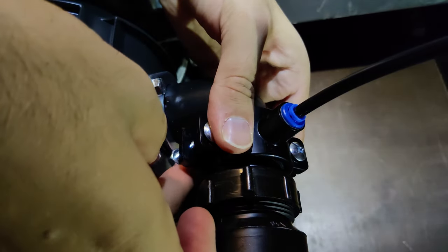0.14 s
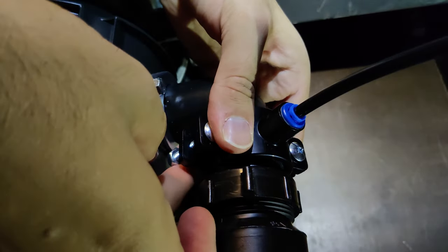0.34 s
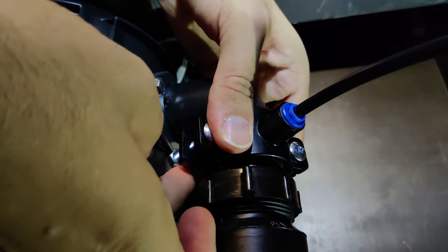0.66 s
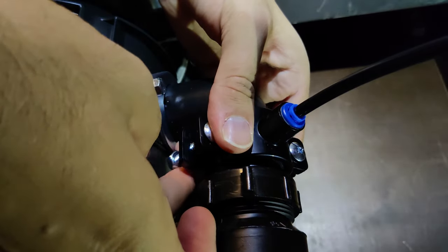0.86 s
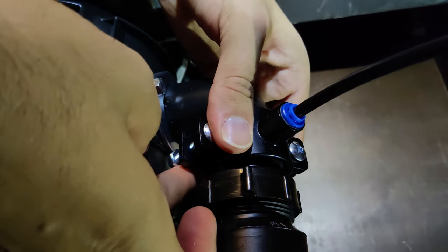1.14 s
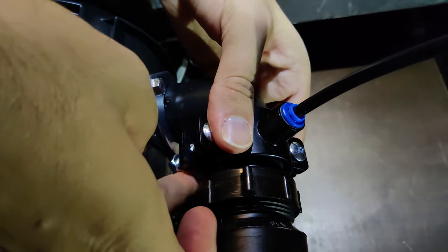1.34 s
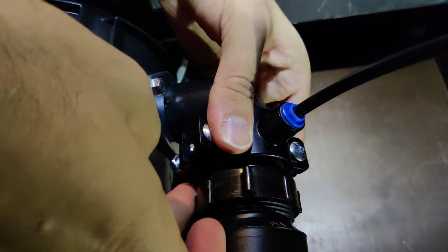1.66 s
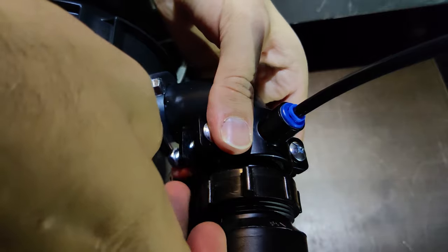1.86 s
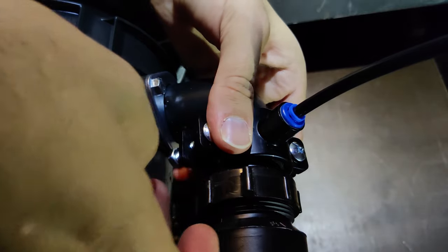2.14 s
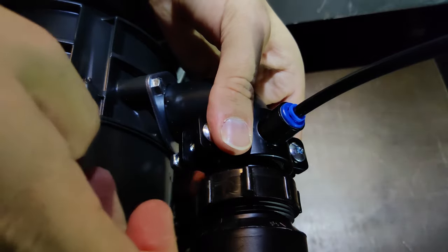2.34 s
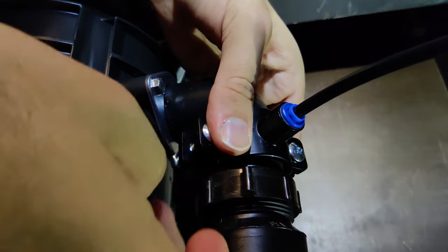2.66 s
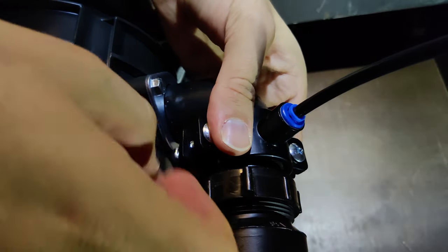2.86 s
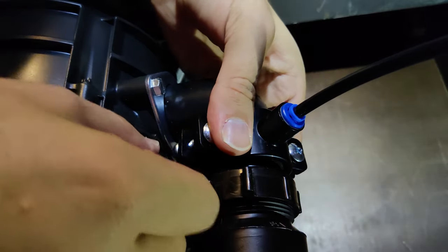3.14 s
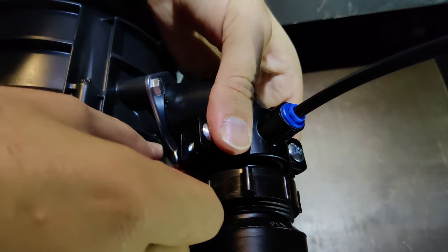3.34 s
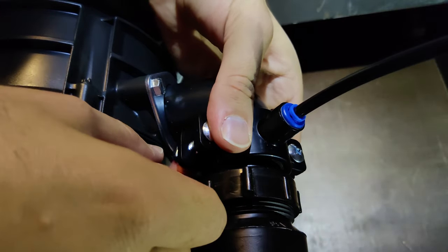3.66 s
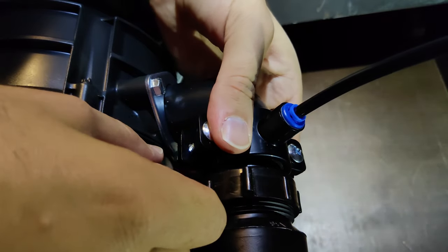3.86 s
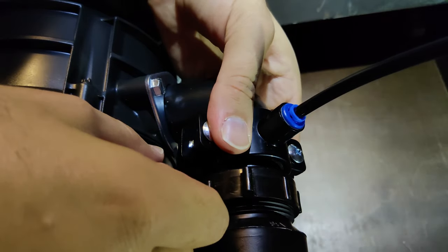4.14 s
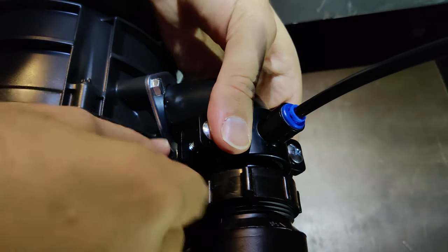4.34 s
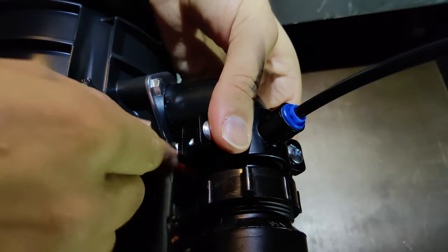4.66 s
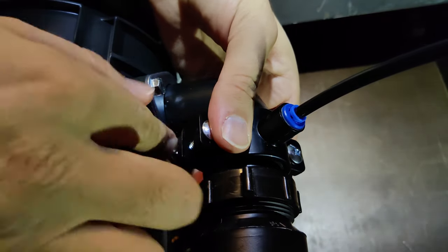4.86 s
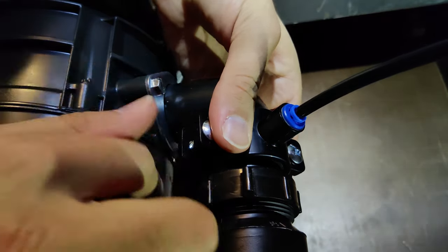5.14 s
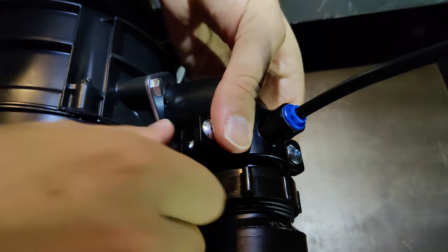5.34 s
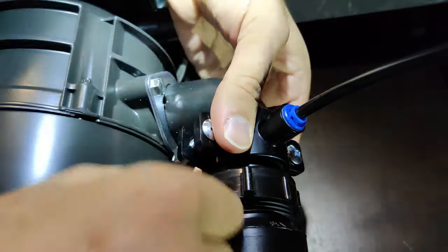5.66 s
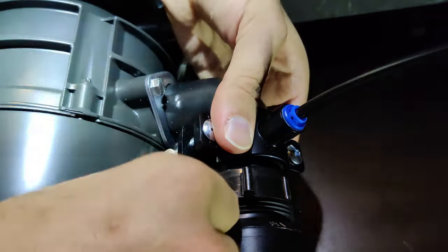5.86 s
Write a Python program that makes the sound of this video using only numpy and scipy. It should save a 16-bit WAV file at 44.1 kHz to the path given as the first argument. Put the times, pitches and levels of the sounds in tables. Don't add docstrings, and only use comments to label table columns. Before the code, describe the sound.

A close handheld microphone inside a small sink cabinet picks up nuts being threaded by hand onto a drain pipe clamp. From 0 to 1.4 s it is mostly deep, wobbling handling rumble, faint room hum and hiss flaring in short puffs, with a few weak ticks and a microphone jolt near 1.0 s. From about 1.6 s irregular clicks, dull hollow knocks and tiny gritty slips begin, clustering around 2.0-2.4 and 2.5-3.0 s, with soft low thuds beneath. The firmest knocks land near 3.2, 3.8 and 4.1 s, amid bright metal ticks. It thins out around 4.3-4.7 s under heavy shaking, then another jolt comes at 5.0 s. A sharp knock and clicks follow at 5.15-5.2 s with a faint bright skin rub until 5.55 s. Strong rattly clicks close at 5.65 and 5.8 s, before a final surge of low rumble. Reflections are short and boxy.

```python
import sys
import numpy as np
from scipy import signal
from scipy.fft import rfft, irfft, next_fast_len
from scipy.io import wavfile
from scipy.ndimage import uniform_filter1d

SR = 44100
rng = np.random.default_rng(int(sys.argv[2]) if len(sys.argv) > 2 else 0)


def bounce(signal):
    frames = np.transpose(np.atleast_2d(signal))
    limited = np.clip(frames, -1, 1)
    pcm = np.round(limited * 32767).astype(np.int16)
    wavfile.write(sys.argv[1], SR, pcm)


def invert_db(x):
    u = np.asarray(x, float) / 20
    return 10 ** u


N = 264159


def add(mix, start_s, sound):
    part = mix[round(start_s * SR):][:len(sound)]
    part += sound[:len(part)]


def knocks():
    # start_s, peak_db, pipe_db and bolt_db (re clamp), favoured_hz (mode set by the spot)
    firm = [(1.612, -21.5, -4, -15, 1480), (2.543, -21, -1, -5.5, 1720), (2.558, -19, -5, -28, 1790),
            (2.876, -20, -8, -4, 1500), (2.915, -28.5, 2, -16, 1870), (3.224, -15.5, 1, -13.5, 1700),
            (3.523, -25, 4, -12, 1720), (3.792, -11, -12.5, -3.5, 1990), (3.849, -26.5, 5, -7, 1950),
            (3.999, -28, -1.5, -11.5, 1980), (4.119, -12, -10, -5, 2100), (4.157, -23, 4, -10.5, 1670),
            (4.717, -22, -3.5, -11.5, 2000), (5.153, -12.5, -14, -15.5, 1800)]
    # start_s, peak_db, pipe_db and bolt_db (re clamp)
    light = [(0.721, -36.5, -3, -21), (0.911, -36, -17, -4), (1.382, -33, 0, -9.5), (1.984, -28.5, -2, -18),
             (2.29, -27.5, 3, -16), (2.761, -32.5, 1.5, -27), (3.19, -26, 0, -2.5), (3.272, -30.5, -12, -1),
             (3.466, -28, -6.5, -10), (3.679, -33, 5, -8), (4.753, -33, -4, -18), (5.072, -31, -4.5, -10),
             (5.486, -35, -4, -8), (5.533, -27, 2.5, -12), (5.587, -32.5, -6, -1.5)]
    out = np.zeros(N)
    for start_s, peak_db, pipe_db, bolt_db, spot_hz in firm + [(*row, 1670) for row in light]:
        nut_db = -13.5 + 0.85 * bolt_db
        add(out, start_s, sudden(peak_db, pipe_db, bolt_db, nut_db, spot_hz))
    return out


def clicks():
    # start_s, peak_db, pipe_db and nut_db (re clamp), favoured_hz
    firm = [(1.923, -22.5, -3, -4, 1120), (2.057, -20.5, -5, -1.5, 1240), (2.235, -17.5, -4, -7, 1270),
            (2.348, -17.5, 0, -2.5, 2000), (2.666, -19.5, -4, 4, 1320), (3.298, -23.5, -6, -5.5, 1870),
            (3.591, -19, -5.5, -1, 2220), (3.899, -22, -1, -4, 950), (4.235, -24, -3.5, -5.5, 3220),
            (4.858, -21, -1.5, -36, 980), (5.186, -18.5, -1, -5.5, 1160), (5.654, -14, 5, 2.5, 1230),
            (5.813, -18.5, 0, 2.5, 2050)]
    # start_s, peak_db, pipe_db and nut_db (re clamp)
    light = [(0.211, -33, -13, 1), (1.739, -21, -32, 4.5), (2.417, -33.5, 3.5, -9), (2.991, -28.5, -21, 11),
             (3.076, -33.5, 3, 2.5), (3.335, -32, -20, 9.5), (3.379, -32.5, 2, 1), (3.636, -33, -7, 1),
             (4.306, -36, 2, -1), (4.782, -35, -12, -0.5), (4.883, -40, -12, 11), (5.09, -34.5, -13, 8.5),
             (5.221, -33, -14, -1), (5.562, -34.5, -3, -10), (5.635, -28, 3, 3)]
    out = np.zeros(N)
    for start_s, peak_db, pipe_db, nut_db, spot_hz in firm + [(*row, 1420) for row in light]:
        bolt_db = -5 + 0.13 * nut_db
        add(out, start_s, sudden(peak_db, pipe_db, bolt_db, nut_db, spot_hz))
    return out


def slips():
    # start_s, peak_db, nut_db (re clamp), swell_s
    slip_events = [(1.707, -31.5, -10, 0.015), (1.721, -31.5, 3.5, 0.014), (2.022, -30.5, -4.5, 0.0085),
                   (2.074, -35, 0, 0.0056), (2.338, -24.5, 1.5, 0.0063), (2.645, -26.5, -2, 0.0077),
                   (2.689, -38.5, -8, 0.016), (2.972, -29.5, -9, 0.011), (3.261, -29, -3, 0.02),
                   (3.316, -35.5, 5, 0.0099), (3.348, -43, -11, 0.017), (3.573, -24, -3, 0.0082),
                   (3.611, -36.5, 8, 0.0082), (3.888, -25.5, -5, 0.0097), (4.139, -30.5, -30, 0.0078),
                   (4.172, -38, -22, 0.0056), (4.205, -28, -5, 0.0073), (4.254, -39.5, 1, 0.0075),
                   (4.825, -32.5, -2, 0.015), (5.164, -32.5, -27, 0.004), (5.2, -33.5, -28, 0.011),
                   (5.14, -29.5, -7, 0.012), (5.514, -38.5, -21, 0.0074), (5.669, -26.5, -1.5, 0.0059)]
    out = np.zeros(N)
    for start_s, peak_db, nut_db, swell_s in slip_events:
        bolt_db = -3.5 + 0.17 * nut_db
        add(out, start_s, gradual(peak_db, 0, bolt_db, nut_db, swell_s))
    return out


def touches():
    # start_s, peak_db, bolt_db and nut_db (re clamp)
    touch_events = [(1.696, -36, -21, -14), (2.148, -42, 1.5, 3.5), (2.304, -44, 4, -4),
                    (2.327, -29.5, 1, -11), (2.434, -40, -7, -3), (2.527, -36.5, -1, 0),
                    (2.634, -30, -1.5, -19), (2.859, -31, -21, 1.5), (3.007, -44, -11, -16),
                    (3.183, -44.5, 0, 9), (3.564, -29.5, -2, -17), (3.865, -34, -4, -17),
                    (4.012, -39, -4, 0), (4.384, -37, -37, -10), (4.485, -39, -6, -10),
                    (4.699, -43, -12, -2), (4.912, -39, -7, -4), (5.109, -39, -10, -22),
                    (5.76, -36.5, -4, -11)]
    out = np.zeros(N)
    for start_s, peak_db, bolt_db, nut_db in touch_events:
        add(out, start_s, gradual(peak_db, -10.5, bolt_db, nut_db, 0.0042))
    return out


def sudden(peak_db, pipe_db, bolt_db, nut_db, spot_hz):
    rattle_s = 0.0069 * np.exp(0.0361 * pipe_db - 0.06 * (peak_db + 20))
    u = np.arange(3000) / SR / rattle_s
    shape = np.exp(-u ** 1.5) * (1 - np.exp(-10 * u))
    return contact(peak_db, pipe_db, bolt_db, nut_db, shape, 2.9, spot_hz, 11.5)


def gradual(peak_db, pipe_db, bolt_db, nut_db, swell_s):
    u = np.arange(3000) / SR / swell_s
    shape = u ** 1.32 * np.exp(-u)
    return contact(peak_db, pipe_db, bolt_db, nut_db, shape, 3.25, 1500, 9.5)


def contact(peak_db, pipe_db, bolt_db, nut_db, shape, grit_db, spot_hz, favour_db):
    # pitch_hz, level_db, t60_s
    pipe = [(450, -2.5, 0.079), (499, 0.5, 0.075), (699, -1.5, 0.12), (248.5, -6.5, 0.097),
            (151.2, -2, 0.72), (360, -7, 0.092)]
    clamp = [(844.5, -9, 0.19), (941, -5, 0.064), (1200, 0.5, 0.028), (1530, -1.5, 0.023),
             (1751, -6.5, 0.05), (1977, 0, 0.02), (2340, 1.5, 0.027), (2750, -2, 0.0055), (2927, -1, 0.016),
             (3240, 0, 0.0087)]
    bolt = [(3820, -2.5, 0.0068), (4675, -7.5, 0.0053), (5170, 1.5, 0.014), (6000, -32, 0.0054),
            (6530, -1.5, 0.015), (7020, -6, 0.031), (7650, -19, 0.075), (8500, -4, 0.017)]
    nut = [(9300, 7.5, 0.027), (9566, 15.5, 0.028), (9350, 8, 0.033), (10400, -5, 0.0088),
           (11430, -2, 0.0072), (12300, -8, 0.0085)]
    grit = invert_db(grit_db * np.minimum(rng.exponential(1, 3000), 3.5)) * rng.standard_normal(3000)
    force = shape * grit
    chance = rng.standard_normal((4, 10, 2))
    hardness_db = 0.51 * bolt_db - 4.0
    favour_db = favour_db * np.clip(-bolt_db / 13, 0, 1)
    favoured = []
    for hz, mode_db, t60_s in clamp:
        nearness = np.exp(-(np.log(hz / spot_hz) / 0.19) ** 2)
        favoured.append((hz, mode_db + favour_db * nearness, t60_s))
    sound = ring(favoured, force, chance[0], 4.0, 0.13, hardness_db)
    swell = 1 - np.exp(-np.arange(len(sound)) / SR / 0.0067)
    sound += invert_db(pipe_db) * ring(pipe, force, chance[1], -7, 0.072) * swell
    sound += invert_db(bolt_db) * ring(bolt, force, chance[2], 6.0, 0.14)
    sound += invert_db(nut_db) * ring(nut, force, chance[3], -12.5, 0.086)
    crackle = np.convolve(force, [1, 1, -1, -1]) / np.sqrt(uniform_filter1d(force ** 2, 200).max())
    crackle_db = max(bolt_db, nut_db) - 19 + 0.28 * (peak_db + 25.5)
    sound[:3003] += invert_db(crackle_db) * crackle
    return invert_db(peak_db - 6) * sound


def ring(modes, force, chance, minor_db, minor_width, tilt_db=0.0):
    t = np.arange(2600) / SR
    hz, db, t60_s = np.transpose(modes)[:, :, None]
    db = db + tilt_db * np.log2(hz / hz[0])
    strength_db = 1.8 * chance[:len(modes), :1]
    pitch = 1 + 0.006 * chance[:len(modes), 1:]
    main = invert_db(db + strength_db - 60 * t / t60_s) * np.sin(2 * np.pi * hz * pitch * t)
    neighbour_hz = hz * np.exp(minor_width * rng.uniform(-1.07, 1, (8, len(modes), 1)))
    signs = rng.choice([-1, 1], neighbour_hz.shape)
    early = t[:450]
    minor = signs * invert_db(db + minor_db - 220 * early / t60_s) * np.sin(2 * np.pi * neighbour_hz * early)
    response = main.sum(0)
    response[:len(early)] += minor.sum((0, 1))
    sound = signal.fftconvolve(force, response)
    sound = balanced(sound, hz, db + strength_db, minor_width)
    return sound / np.sqrt(2 * uniform_filter1d(sound ** 2, 200).max())


def balanced(sound, hz, db, spread):
    size = 8192
    f = np.fft.rfftfreq(size, 1 / SR)
    spectrum = rfft(sound, size)
    wanted = (invert_db(2 * db) * np.exp(-(np.log((f + 1) / hz) / spread) ** 2)).sum(0)
    bins = int(spread * hz.mean() * size / SR) + 1

    def smooth(power):
        return abs(uniform_filter1d(uniform_filter1d(power, bins), bins))

    correction = np.sqrt(smooth(wanted) / (smooth(abs(spectrum) ** 2) + 1e-12))
    return irfft(spectrum * correction)[:len(sound)]


def cabinet(x):
    t = np.arange(6000) / SR
    t60_s, level_db, gap_s = 0.077, -7, 0.0015
    tail = rng.standard_normal(6000) * invert_db(-60 * t / t60_s) * (t > gap_s)
    return x + invert_db(level_db) * signal.fftconvolve(x, tail / np.linalg.norm(tail))[:N]


def thuds():
    # start_s, peak_db, pitch_hz, t60_s
    thud_events = [(1.414, -41, 99, 0.23), (2.06, -30.5, 73, 0.16), (2.338, -28.5, 100.5, 0.18),
                   (2.667, -32, 72.7, 0.15), (2.994, -24, 74, 0.048), (3.229, -29.5, 83, 0.15),
                   (3.299, -36, 72, 0.12), (3.589, -30, 84, 0.13), (3.789, -55, 72, 0.11),
                   (4.241, -29, 72.7, 0.15), (4.859, -41, 74, 0.1), (5.18, -26.5, 102.8, 0.24),
                   (5.237, -30, 71, 0.18), (5.551, -29, 72.7, 0.14), (5.66, -38, 88, 0.14),
                   (5.818, -27.5, 74.6, 0.19)]
    out, t = np.zeros(N), np.arange(12000) / SR
    for start_s, peak_db, hz, t60_s in thud_events:
        envelope = invert_db(peak_db + 7 - 60 * t / t60_s) * (1 - np.exp(-t * hz))
        add(out, start_s, envelope * np.sin(2 * np.pi * hz * t))
    return out


def bumps():
    # start_s, step (full scale), relax_s
    step_events = [
        (1.021, 0.057, 0.061),
        (5.002, -.05, 0.012),
    ]
    out, t = np.zeros(N), np.arange(8000) / SR
    for start_s, step, relax_s in step_events:
        add(out, start_s, step * np.exp(-t / relax_s) * (1 - np.exp(-t / 0.00006)))
    return out


def noise(spectrum):
    size = next_fast_len(N, True)
    hz = np.fft.rfftfreq(size, 1 / SR)
    f, db = np.transpose(spectrum)
    colour = invert_db(np.interp(np.log(hz + 0.033), np.log(f), db, left=-60))
    colour *= invert_db(-12 * np.log2(np.maximum(hz / f[-1], 1)))
    x = irfft(rfft(rng.standard_normal(size)) * colour, size)[:N]
    return x / np.sqrt(np.mean(x ** 2) + 1e-20)


def shaking(grip_db, busy):
    # pitch_hz, level_db (per Hz)
    sway_spectrum = [(2, -4.5), (7, -7), (12, -5), (17, -3.5), (26, -11.5), (35, -25), (48, -34), (70, -68)]
    tremor_spectrum = [(14, -8), (19, 1), (27, -6), (36, -16)]
    t = np.arange(N) / SR
    tremor = invert_db(-16 + 12 * uniform_filter1d(busy, SR)) * noise(tremor_spectrum)
    shake = invert_db(grip_db) * (noise(sway_spectrum) + tremor)
    fade = np.clip(np.minimum(t, t[-1] - t + 0.01) / 0.04, 0, 1)
    return 0.45 * np.tanh(shake / 0.45) * fade


def rumble(busy):
    # pitch_hz, level_db (per Hz)
    handling_spectrum = [(30, 8), (48, -4), (75, -8.5), (105, 0.5), (135, -15), (200, -7), (310, -21.5),
                         (450, -14)]
    room_spectrum = [(250, 0), (380, -5.5), (480, 0.5), (620, -6.5), (850, 3), (1300, -4), (2500, -10),
                     (5000, -16)]
    handling = invert_db(-47.5 + 9 * busy) * noise(handling_spectrum)
    return handling + invert_db(-49 - 0.5 * busy) * noise(room_spectrum)


def skin():
    # time_s, level_db
    slide = [
        (5.15, -51),
        (5.272, -50.5),
        (5.55, -50.5),
    ]
    level_db = np.interp(np.arange(N) / SR, *np.transpose(slide), left=-120, right=-120)
    return invert_db(level_db - 1.5) * noise([(3500, -29), (5200, -3), (6500, -4), (8500, 0), (10500, -3)])


def hiss():
    # pitch_hz, level_db (per Hz)
    hiss_spectrum = [(800, -3.5), (2500, -3), (6000, -1), (10000, -2), (15000, -3.5)]
    # centre_s, rise_db
    flares = [(.125, 2.5), (.345, 2), (.587, 5), (.737, 1), (.812, 6.5), (.885, 6), (.998, 7), (1.065, 5),
              (1.268, 2.5), (1.347, 5), (1.470, 2.5), (1.513, 2.5), (2.475, -1), (4.52, 4), (4.925, 5)]
    t = np.arange(N) / SR
    flare_db, u = np.zeros(N), t[:2000] - t[1000]
    for centre_s, rise_db in flares:
        add(flare_db, centre_s - t[1000], rise_db * np.exp(-(u / 0.0091) ** 2))
    return invert_db(-59 + 7.5 + flare_db) * noise(hiss_spectrum)


def background(work):
    # time_s, shaking_db
    grip = [(0.0, -15.5), (0.08, -18.5), (0.78, -18), (0.8, -10), (2.13, -23.5), (2.2, -18), (3.19, -19),
            (3.35, -16.5), (3.5, -22.5), (3.77, -15), (3.84, -21), (4.64, -13), (4.72, -24), (4.97, -9),
            (5.2, -26), (5.36, -13.5), (5.94, -15.5), (5.99, 11)]
    grip_db = np.interp(np.arange(N) / SR, *np.transpose(grip))
    work_rms = np.sqrt(abs(uniform_filter1d(work ** 2, int(0.26 * SR) + 1)))
    busy = np.tanh(work_rms / invert_db(-38))
    recover_s, duck_from_db, duck_share = 0.11, -18, 0.66
    r = np.exp(-1 / (recover_s * SR))
    felt = signal.lfilter([1 - r], [1, -r], invert_db(2 * grip_db))
    duck = (1 + felt / invert_db(2 * duck_from_db)) ** (-duck_share / 2)
    return shaking(grip_db, busy) + duck * (rumble(busy) + skin() + hiss())


def scene():
    work = cabinet(knocks() + clicks() + slips() + touches())
    return (work + thuds() + bumps() + background(work))[None]


def roll_off(x):
    return signal.sosfilt(signal.butter(12, 16480, fs=SR, output="sos"), x)


def record(dry):
    edge_hz, bias = 15900, 0.064
    taps = signal.firwin(301, edge_hz, window=("kaiser", 8), fs=SR)
    padded = np.pad(dry, ((0, 0), (150, 150)), "reflect")
    limited = signal.oaconvolve(padded, taps[None], "valid")
    return roll_off(limited + bias)


dry = scene()
out = record(dry)
bounce(out)
```